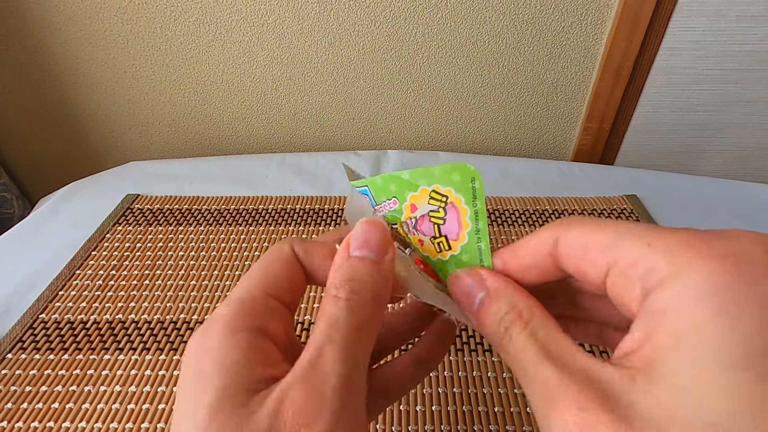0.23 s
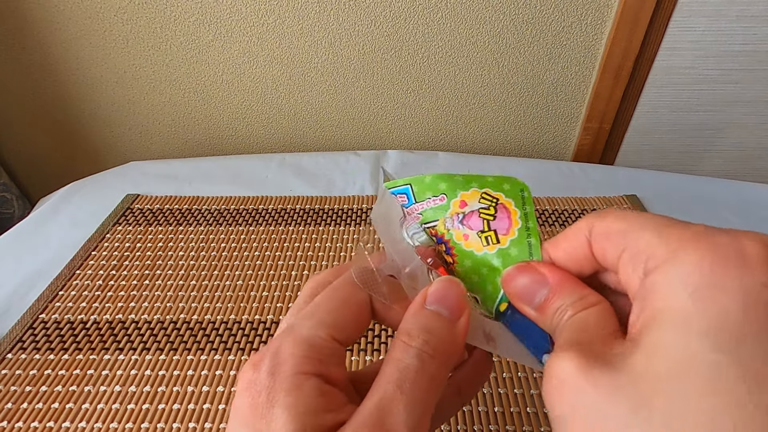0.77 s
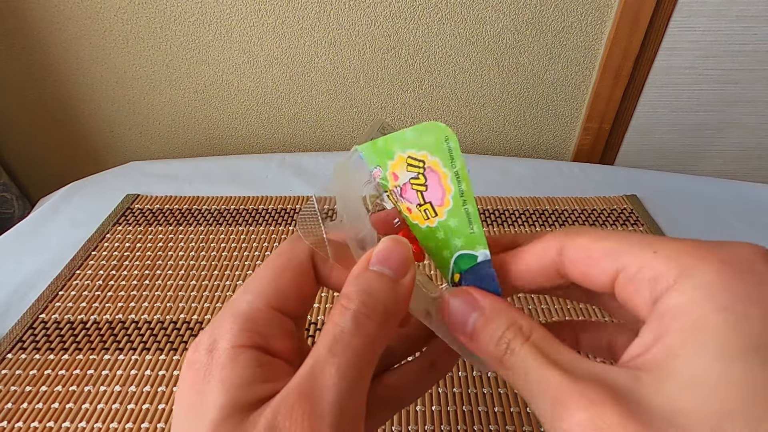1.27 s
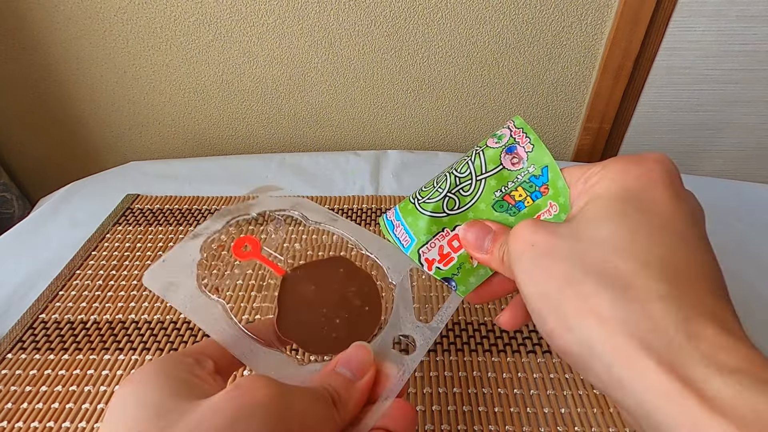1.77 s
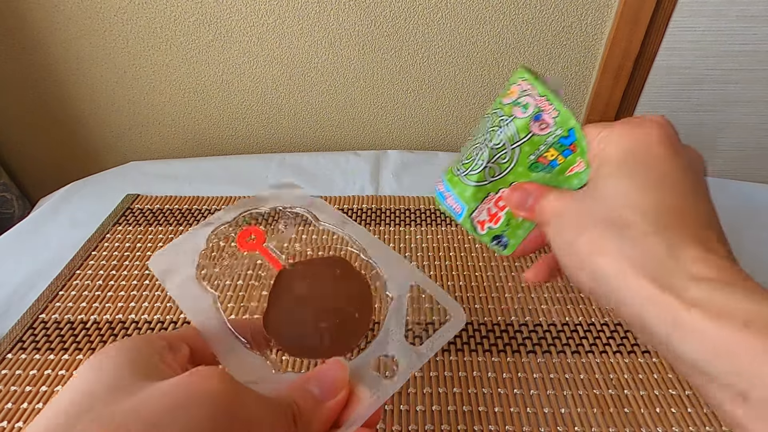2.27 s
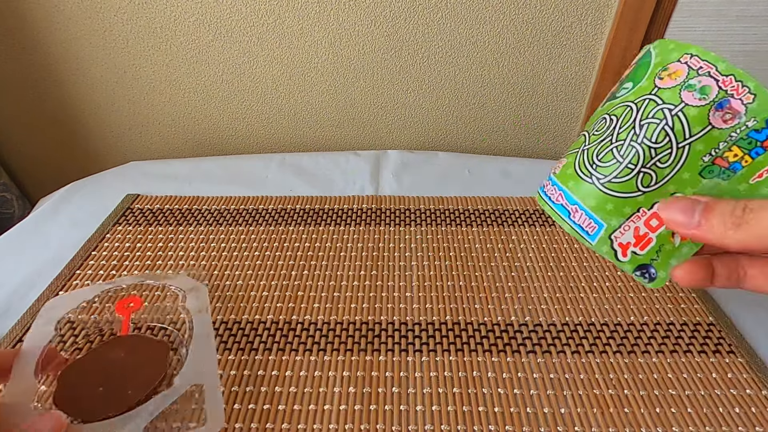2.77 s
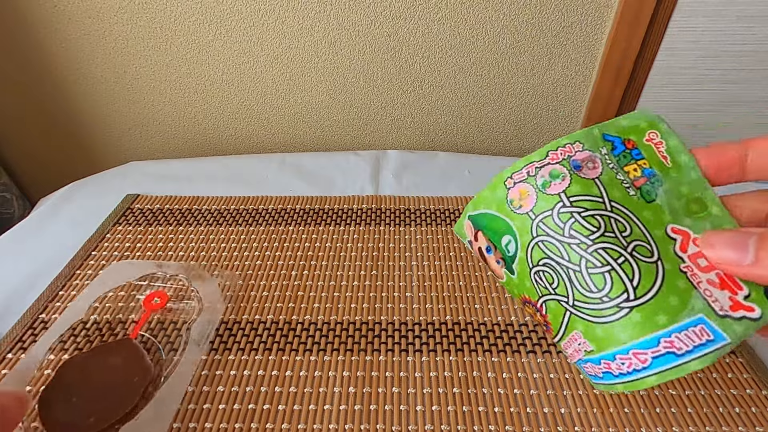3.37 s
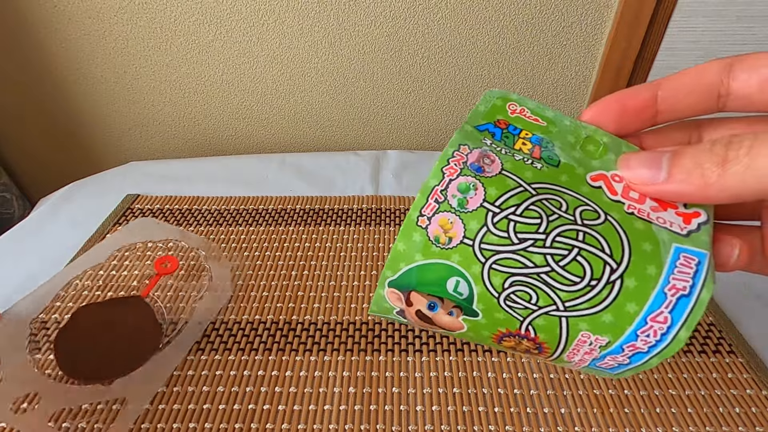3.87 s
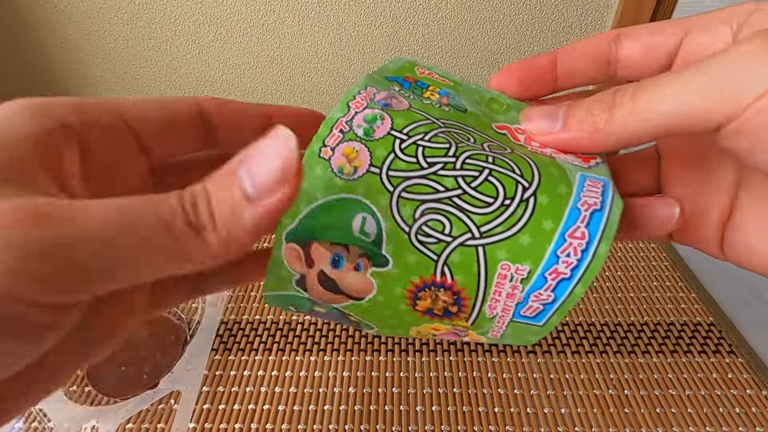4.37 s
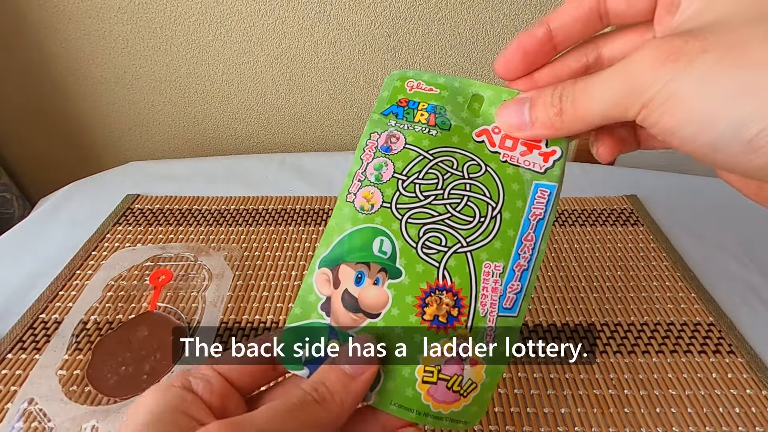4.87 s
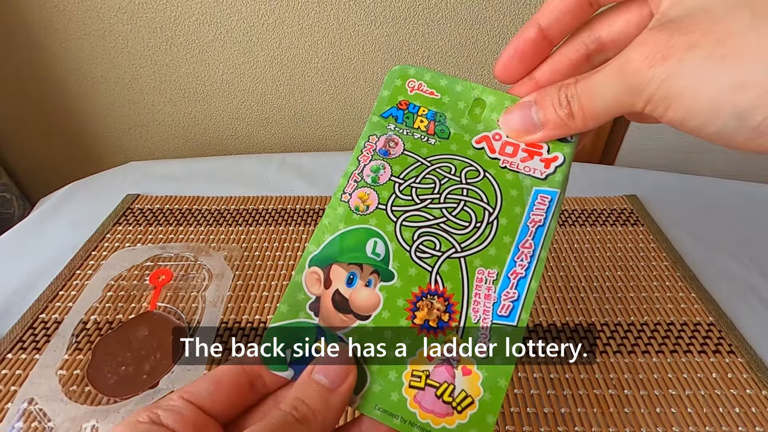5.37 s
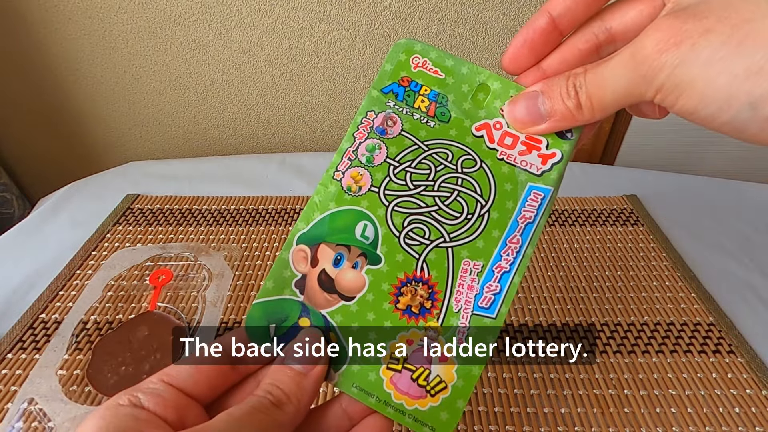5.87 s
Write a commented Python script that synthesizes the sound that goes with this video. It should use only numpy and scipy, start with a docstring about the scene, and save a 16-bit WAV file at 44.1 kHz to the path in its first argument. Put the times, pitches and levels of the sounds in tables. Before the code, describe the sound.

Very close in a small quiet room, hands pick at a sheet sealed to a thin plastic tray. A sharp crackle opens, then small ticks and faint rasps, growing into a loud tearing burst before two seconds and another hard cluster of snaps soon after. The tray thumps and rumbles over a ribbed mat, fingers rustle on the sheet with crisp pops, then it is held nearly still with a few clicks.

```python
"""Peeling a sheet from a plastic tray

A printed backing sheet is peeled off a thin plastic snack tray, close by in a small quiet room. Sheet and tray
buckle in snaps (kicked, band-limited noise bursts) and small creases ring, while the seal tears with a grainy
rasp (stick-slip pulses in noise). The tray is pushed over a ribbed mat and the table rumbles (resonant noise),
while fingers slide over the sheet and flex it a few times. Echoes and a faint room tone lie behind.
"""
import sys
import numpy as np
from scipy import signal
from scipy.fft import rfft, irfft
from scipy.io import wavfile
from scipy.ndimage import uniform_filter1d, map_coordinates

SR = 44100
rng = np.random.default_rng(int(sys.argv[2]) if len(sys.argv) > 2 else 0)


def int16_out(signal):
    """Quantize to a 16-bit WAV file."""
    q = np.round(np.clip(np.atleast_2d(signal).T, -1, 1) * 32767)
    wavfile.write(sys.argv[1], SR, q.astype(np.int16))


N = 269890
TIME = np.arange(N) / SR

# buckles of sheet and tray; levels are rms over one SNAP_S:
# (time [s], ring level [dB], ring pitch [Hz], crack level [dB], crack pitch [Hz])
BUCKLES = [(0.0027, -16.5, 1800, -17.5, 5100), (0.033, -32, 1190, -55, 4600),
           (0.05, -21.5, 1450, -40, 3360), (0.184, -45, 1260, -47, 3640), (0.48, -28.5, 1050, -18.5, 2500),
           (0.5966, -46, 1240, -41.5, 2600), (0.6265, -46, 1740, -45, 4800),
           (0.6719, -33, 1040, -41.5, 5450), (0.7072, -36.5, 980, -51, 5500),
           (0.7344, -33, 1470, -64, 4000), (0.8002, -23.5, 1800, -28.5, 4620), (0.95, -25, 1530, -61, 4100),
           (0.956, -28, 1820, -56, 2900), (0.9801, -31, 1150, -35.5, 2320), (1.042, -47, 890, -46, 2370),
           (1.1526, -38, 1280, -75, 5430), (1.165, -31, 1100, -29, 2800), (1.173, -12, 2010, -23.5, 6460),
           (1.2865, -51, 1300, -39, 5900), (1.3066, -36.5, 1140, -35, 3270),
           (1.3922, -24.5, 1220, -34, 2970), (1.433, -31.5, 1230, -34.5, 5000),
           (1.47, -26.5, 1090, -35.5, 4660), (1.5654, -38.5, 1410, -45.5, 4800),
           (1.599, -35.5, 1180, -47, 4340), (1.685, -26.5, 586, -28, 2640),
           (1.721, -18.5, 990, -25.5, 5100), (1.7364, -19.5, 860, -39, 4600),
           (1.764, -14.5, 1010, -18, 5700), (1.7663, -23.5, 900, -31, 4900),
           (1.7906, -16.5, 850, -23, 2380), (1.799, -19, 911, -29.5, 3420), (1.8416, -25, 1330, -47, 5600),
           (1.8889, -31.5, 1380, -38.5, 4580), (2.323, -15.5, 1540, -14.5, 6300),
           (2.3263, -14.5, 1670, -24.5, 5800), (2.3328, -24, 1750, -34, 4700),
           (2.3827, -17.5, 1300, -26, 3350), (2.3835, -12.5, 1210, -24, 2850),
           (2.3925, -14.5, 1230, -25, 3540), (2.4208, -24, 1300, -37, 5100), (2.436, -20, 1190, -27, 3300),
           (2.513, -28.5, 1640, -31, 4870), (2.6176, -34.5, 1290, -53, 6500),
           (2.809, -20.5, 2010, -22, 2780), (2.867, -28.5, 1750, -36, 3550), (2.9941, -28, 2300, -53, 5650),
           (3.7028, -31, 1530, -35, 5440), (3.7891, -30.5, 884, -37, 3900),
           (3.8471, -24, 1230, -25.5, 3400), (3.9165, -22, 1660, -29.5, 5940),
           (3.931, -29, 1760, -36, 4740), (3.955, -30, 1780, -37, 5650), (3.9757, -30, 1750, -38, 5400),
           (4.026, -34, 1880, -39.5, 3060), (4.1406, -40.5, 2170, -40, 4300),
           (4.3355, -37.5, 645, -35, 1610), (5.083, -33, 880, -61, 2390), (5.1366, -16, 1080, -29.5, 3320),
           (5.149, -19.5, 1150, -34, 3590), (5.2306, -29, 905, -55, 1880), (5.4367, -34, 734, -39, 1565),
           (5.502, -42, 1010, -79, 2927)]
SNAP_S = 0.002
# a larger panel rings lower and pushes more air: thud relative to the ring at PANEL_HZ, and its change with pitch
PANEL_HZ, THUD_DB, THUD_DB_PER_OCTAVE = 1100, -9, -10.5

# Stroke tables: levels are relative to the trims of the layer they drive.
# pulls that tear the seal or drag the sheet over the rim:
# (peak time [s], rise [s], fall [s], rasp level [dB], hiss level [dB])
PEEL_PULLS = [(0.005, 0.03, 0.096, -45, -38), (0.16, .04, 0.17, -61, -50), (0.26, .1, 0.089, -53, -47),
              (0.485, 0.04, 0.32, -55, -50.5), (0.81, 0.0077, 0.3, -51, -54.5),
              (0.957, 0.022, 0.1, -35.5, -49), (1.093, .01, .1, -62, -61), (1.177, 0.028, 0.13, -46, -42),
              (1.283, 0.025, 0.052, -47.5, -39.5), (1.368, 0.042, 0.0087, -52.5, -38.5),
              (1.40, 0.016, 0.21, -44, -57), (1.475, .025, 0.086, -35.5, -41), (1.57, .08, 0.11, -43, -47),
              (1.726, 0.016, 0.14, -27.5, -36), (1.795, .12, 0.13, -28, -40.5),
              (2.155, .13, 0.069, -53.5, -66.5), (2.23, .03, 0.1, -63.5, -62),
              (2.325, .018, 0.051, -26.5, -30), (2.388, 0.036, .10, -25, -36)]
# slides of the fingers while the sheet is turned over:
# (peak time [s], rise [s], fall [s], rasp level [dB], hiss level [dB])
FINGER_SLIDES = [(2.705, 0.072, 0.26, -44.5, -46), (2.87, 0.17, 0.052, -44.5, -48),
                 (2.995, 0.081, 0.069, -47, -39.5), (3.167, 0.088, 0.2, -42.5, -42.5),
                 (3.462, 0.081, 0.058, -50.5, -46.5), (3.54, 0.033, 0.035, -45, -47.5),
                 (3.60, 0.046, 0.15, -41.5, -48.5), (3.70, 0.12, 0.14, -39.5, -43),
                 (3.79, 0.019, 0.052, -44, -44), (3.853, 0.0096, 0.031, -26.5, -43.5),
                 (3.925, 0.036, 0.095, -30.5, -37.5), (4.088, 0.085, 0.13, -49.5, -45.5),
                 (4.32, 0.13, 0.17, -71, -61)]
# shifts of the grip on the held sheet: (peak time [s], rise [s], fall [s], rasp level [dB], hiss level [dB])
GRIP_SHIFTS = [(0.36, 0.071, 0.53, -63.5, -59.5), (0.62, 0.033, 0.24, -65, -66.5),
               (4.555, 0.0076, 0.049, -55.5, -59), (4.665, 0.036, 0.31, -55.5, -53.5),
               (4.775, 0.039, 0.06, -49.5, -64.5), (4.815, 0.014, .12, -58, -54.5),
               (4.903, 0.017, 0.026, -43.5, -65), (4.96, 0.23, 0.3, -65, -61),
               (5.088, 0.013, .06, -50.5, -63), (5.143, 0.041, 0.061, -37.5, -55),
               (5.237, .01, 0.041, -59.5, -81), (5.44, .01, 0.067, -50, -86), (5.5, .07, .12, -65.5, -73)]
# the sheet edge singing thinly as it slides: (peak time [s], rise [s], fall [s], level [dB])
EDGE_ZINGS = [(2.32, 0.027, 0.071, -55), (2.37, .04, 0.011, -42), (3.32, 0.29, 0.13, -55),
              (3.46, 0.063, 0.059, -47)]
# shoves and bumps that shake the table:
# (peak time [s], rise [s], fall [s], rumble level [dB], slow sway level [dB])
TABLE_SHOVES = [(0.98, 0.056, 0.11, -56, -49), (1.18, 0.063, 0.53, -55, -57),
                (1.40, 0.019, 0.089, -57, -68), (1.58, .06, 0.18, -54, -42.5),
                (1.73, 0.05, 0.11, -35.5, -57), (1.80, 0.053, .13, -35, -44.5),
                (2.335, 0.018, .19, -30, -42), (2.805, 0.024, 0.29, -24.5, -65),
                (2.86, 0.076, 0.053, -37.5, -40), (3.17, 0.22, 0.29, -47, -60), (3.42, 0.093, .4, -46, -70),
                (3.56, .06, 0.24, -38, -57), (3.68, 0.072, 0.28, -31, -40),
                (3.805, 0.044, 0.27, -30.5, -39), (3.925, 0.035, 0.16, -28.5, -39),
                (4.135, 0.086, 0.094, -30.5, -34), (4.19, .05, 0.24, -59.5, -34),
                (4.80, .05, 0.043, -57, -65), (4.905, 0.014, 0.031, -51, -64),
                (5.15, 0.041, 0.07, -34.5, -34.5), (5.237, .012, 0.044, -48.5, -57),
                (5.44, .012, .05, -57, -69)]
FADE_DB = 20  # a stroke climbs this far in its rise time and sinks as far in its fall time
LET_GO_DB = 39.5  # beyond those times the contact is lost: extra loss per further rise or fall time

# relative spectrum of the tearing seal: (frequency [Hz], level [dB])
PEEL_SPECTRUM = [(150, 8), (250, 9), (420, 0.5), (700, 5), (1100, 7), (1700, -3), (2500, -11.5),
                 (3600, -16.5), (4800, -18.5), (6300, -19), (7600, -21), (8900, -36.5), (12000, -49.5),
                 (15000, -63.5)]
# relative spectrum of the sliding fingers: (frequency [Hz], level [dB])
SLIDE_SPECTRUM = [(200, -10), (420, -4), (750, 2), (1200, 3.5), (1850, 10.5), (2500, -1.5), (3400, -3),
                  (4600, -6.5), (6100, -6.5), (7600, -11.5), (8900, -28.5), (12000, -40), (15000, -48)]
# relative spectrum of the shifting grip: (frequency [Hz], level [dB])
GRIP_SPECTRUM = [(150, 16), (400, 14.5), (800, 9), (1600, 3), (2600, -13), (4200, -17.5), (6000, -15),
                 (7500, -13), (8900, -31), (12500, -35), (15000, -53.5)]
SPLIT_HZ = 2700  # rasp lies below, hiss above

# low resonances of the table: (frequency [Hz], bandwidth [Hz], relative level [dB])
TABLE_RESONANCES = [(74, 8.3, -4.5), (96.2, 17, 3), (144.7, 13, 3), (204.9, 24, -1), (254, 46, -11.5)]
# narrow resonances of the table top and the corner around it: (frequency [Hz], level [dB])
CORNER_RESONANCES = [(210, 8), (501, -0.5), (615, 0), (706, 5.5), (864, -2), (937, -6), (1205, -3.5),
                     (1365, -7)]
# reverberation time of the room, for a decay of 60 dB: (frequency [Hz], time [s])
REVERB_TIMES = [(150, 0.23), (500, 0.09), (1500, 0.24), (4000, 0.33), (8000, .24)]
# relative spectrum of the quiet room: (frequency [Hz], level [dB])
ROOM_SPECTRUM = [(12, -37.5), (20, -11), (55, -4), (98, -25.5), (155, -13.5), (176, -15), (278, -20),
                 (323, -20), (449, -21.5), (497, -18.5), (536, -34.5), (726, -27), (2210, -26.5),
                 (3230, -42), (8450, -55.5), (11000, -80.5), (18600, -120)]
ROOM_DB = -62.5
CUTOFF_HZ = 15300


def snaps(scatter=0.16, crack_scatter=0.39, tear_slope=0.16, ring_cycles=5.3, crack_cycles=8.2,
          thud_s=0.005, tick_s=0.00083, ring_width=1.5, crack_width=1.28, tick_db=-24.0):
    """Impulsive buckling: one sharp kick, then decaying bending waves that run back and forth in the sheet."""
    t = TIME[:SR // 25]
    out = np.zeros(N + len(t))
    ring_band = ring_width ** np.array([-1, 1])  # band edges as ratios to the pitch
    crack_band = crack_width ** np.array([-1, 1])
    chances = rng.standard_normal((len(BUCKLES), 4, len(t)))
    for (s, ring_db, ring_hz, crack_db, crack_hz), chance in zip(BUCKLES, chances):
        decay_s = np.array([[ring_cycles / ring_hz], [crack_cycles / crack_hz], [thud_s], [tick_s]])
        # a strong crack runs on as a short zip
        tearing = crack_scatter * from_db(tear_slope * (crack_db + 31.5))
        shares = np.array([[scatter], [tearing], [scatter], [tearing]])
        kick = t == 0
        flex, crease, push, edge = kick + shares * chance * np.exp(-t / decay_s)

        ring = butter(flex, ring_hz * ring_band, "band")  # the panel that flips
        crack = butter(crease, crack_hz * crack_band, "band")  # the crease itself
        ring, crack = butter([ring, crack], 7930, "low", order=12)
        thud = butter(push, [185, 560], "band")  # the whole sheet recoils
        tick = butter(edge, [8000, 12500], "band")

        thud_db = ring_db + THUD_DB + THUD_DB_PER_OCTAVE * np.log2(ring_hz / PANEL_HZ)
        # high creases reach further into the top treble
        edge_db = crack_db + tick_db + 13 * np.log2(crack_hz / 6000)
        start = max(0, int(s * SR))
        for part, db in ((ring, ring_db), (crack, crack_db), (thud, thud_db), (tick, edge_db)):
            unit_part = part * np.sqrt(SNAP_S * SR / np.sum(part ** 2))
            out[start:start + len(t)] += from_db(db) * unit_part
    return out[:N]


def crinkles(rows, per_s, level_db, spread_db=1.0, cycles=1.4, low_hz=1200, high_hz=6000):
    """Randomly excited resonance: small creases flip by chance, each ringing briefly at one of eight pitches."""
    pitches = np.geomspace(low_hz, high_hz, 8)
    born = rng.random(N) < per_s / SR
    dealt = rng.integers(0, len(pitches), N)
    size_db = level_db + spread_db * np.minimum(rng.exponential(1, N), 3)
    sizes = born * from_db(size_db) * rng.choice([-1, 1], N)
    rasp_gain, hiss_gain = strokes(rows)
    out = 0
    for k, hz in enumerate(pitches):
        radius = from_db(-60 * hz / (cycles * SR))  # the ring falls 60 dB in this many cycles
        angle = 2 * np.pi * hz / SR
        kicks = sizes * (dealt == k) * (rasp_gain if hz < SPLIT_HZ else hiss_gain)
        resonator = [1, -2 * radius * np.cos(angle), radius ** 2]
        out = out + signal.lfilter([0, np.sin(angle)], resonator, kicks + 1e-18)
    return butter(out, 8600, "low", order=8)


def friction(rows, spectrum, slips_per_s, spread_db, smooth, flutter_db, rasp_db, hiss_db):
    """Stick-slip friction: tiny releases of uneven size, in clumps, over a smooth rubbing noise."""
    sizes = from_db(spread_db * np.minimum(rng.exponential(1, N), 4)) * rng.choice([-1, 1], N)
    clumped_rate = slips_per_s * from_db(3 * drift(90))
    slips = sizes * (rng.random(N) < clumped_rate / SR)
    rubbing = smooth * rng.standard_normal(N)
    grain = bending(coloured(rms_one(slips) + rubbing, spectrum))
    rasp = butter(butter(grain, 230, "high"), SPLIT_HZ, "low", order=4)
    rasp = evened(rasp, 0.05)
    hiss = evened(butter(grain, SPLIT_HZ, "high", order=4), 0.15)
    rasp_gain, hiss_gain = strokes(rows)
    rub = from_db(rasp_db) * rasp_gain * rasp + from_db(hiss_db) * hiss_gain * hiss
    return rub * from_db(flutter_db * drift(160))


def bending(x, depth_db=2.5, spacing_hz=240, shifts_per_s=18):
    """Time-varying resonance: the many peaks of the sheet's response come and go as it bends."""
    hz, s, frames = signal.stft(x, SR, nperseg=512)
    field = rng.standard_normal((128, 256))
    places = np.meshgrid(hz / spacing_hz, s * shifts_per_s, indexing="ij")
    peaks = map_coordinates(field, places, order=1, mode="mirror")
    return signal.istft(frames * from_db(depth_db * rms_one(peaks)), SR)[1][:N]


def zing(hz=6100, width_hz=1000):
    """Friction-driven resonance: the sliding edge excites one high, broad mode."""
    tone = butter(rng.standard_normal(N), [hz - width_hz / 2, hz + width_hz / 2], "band")
    return strokes(EDGE_ZINGS)[0] * rms_one(tone) * from_db(4.3 * drift(91))


def table(sway_db=-2.0):
    """Forced vibration: hands and tray rub over the ribs of the mat and shake the low modes of the table."""
    bumps = rng.standard_normal(N)
    rumble = 0
    for hz, width, db in TABLE_RESONANCES:
        mode = butter(bumps, [hz - width / 2, hz + width / 2], "band")
        rumble = rumble + from_db(db) * evened(mode, 0.2)
    sway = evened(butter(rng.standard_normal(N), [24, 58], "band"), 0.089)
    rumble_gain, sway_gain = strokes(TABLE_SHOVES)
    return rumble_gain * rms_one(rumble) + from_db(sway_db) * sway_gain * sway


def corner(x, width_hz=16):
    """Sympathetic resonance: the plastic sounds set nearby narrow modes ringing faintly."""
    ringing = 0
    for hz, db in CORNER_RESONANCES:
        band = [hz - width_hz / 2, hz + width_hz / 2]
        ringing = ringing + from_db(db) * butter(x, band, "band", order=1)
    return ringing


def room(x, gap_s=0.0035, low_db=5.0, high_db=-9.5):
    """Reverberation: dense wall echoes arrive after a short gap and die away band by band."""
    t = TIME[:SR // 2]
    response = 0
    edges = np.geomspace(90, 16000, 9)
    for low, high in zip(edges, edges[1:]):
        hz = np.sqrt(low * high)
        decay = from_db(-60 * t / at_hz(REVERB_TIMES, hz))
        onset = np.clip(t / gap_s - 0.5, 0, 1)  # silent for half of gap_s, full after 1.5 of it
        tail = rng.standard_normal(len(t)) * decay * onset
        colour_db = at_hz([(600, low_db), (2000, 0.0039), (7000, high_db)], hz)
        echo_band = butter(tail / np.sqrt(np.sum(tail ** 2)), [low, high], "band")
        response = response + from_db(colour_db) * echo_band
    return signal.fftconvolve(x, response)[:N]


def room_tone():
    """Stationary background noise: the faint, steady sound of the quiet room."""
    return from_db(ROOM_DB) * coloured(rng.standard_normal(N), ROOM_SPECTRUM)


def strokes(rows):
    """Power addition of envelopes: strokes swell and die away, overlaps add in power; one gain per level column."""
    t = TIME[::16]
    power = 0
    for s, rise_s, fall_s, *levels_db in rows:
        away = np.maximum((s - t) / rise_s, (t - s) / fall_s)
        below_db = FADE_DB * away + LET_GO_DB * np.maximum(away - 1, 0)
        power = power + from_db(np.array(levels_db)[:, None] - below_db) ** 2
    return [np.interp(TIME, t, np.sqrt(p + 1e-18)) for p in power]


def drift(per_s):
    """Slow random modulation: chance values joined by straight lines, with spread 1."""
    return np.interp(TIME * per_s, np.arange(8000), rng.standard_normal(8000)) * np.sqrt(3 / 2)


def evened(x, seconds):
    """Level normalisation: hold the running rms of a signal at 1."""
    power = np.abs(uniform_filter1d(x ** 2, max(3, int(seconds * SR))))
    return x / np.sqrt(power + 1e-12)


def coloured(x, spectrum):
    """Spectral shaping: weight a signal's frequencies by a table, at unit rms."""
    gain = from_db(at_hz(spectrum, np.fft.rfftfreq(N, 1 / SR)))
    return rms_one(irfft(rfft(x) * gain, N))


def butter(x, hz, kind, order=2):
    """Linear filtering: a causal Butterworth filter."""
    sos = signal.butter(order, np.clip(hz, 10, 0.45 * SR), kind, fs=SR, output="sos")
    return signal.sosfilt(sos, x)


def at_hz(points, hz):
    """Logarithmic frequency scale: read a table along it."""
    f, value = np.transpose(points)
    return np.interp(np.log(np.maximum(hz, 1)), np.log(f), value)


def rms_one(x):
    """Effective value: scale to unit rms."""
    return x / np.sqrt(np.mean(x ** 2) + 1e-20)


def from_db(db):
    """Logarithmic level: decibels to amplitude gain."""
    return 10 ** (np.asarray(db) / 20)


def scene():
    """Superposition: all sounds add in the centre, and mainly the treble spreads a little to the sides."""
    peel = friction(PEEL_PULLS, PEEL_SPECTRUM, slips_per_s=330, spread_db=5.5, smooth=0.93,
                    flutter_db=1.97, rasp_db=-3.0, hiss_db=-1.0)
    slide = friction(FINGER_SLIDES, SLIDE_SPECTRUM, slips_per_s=830, spread_db=1.0, smooth=0.6,
                     flutter_db=2.5, rasp_db=-3.5, hiss_db=-0.5)
    hold = friction(GRIP_SHIFTS, GRIP_SPECTRUM, slips_per_s=4800, spread_db=2.0, smooth=0.7,
                    flutter_db=1.5, rasp_db=-2.0, hiss_db=-0.5)
    creases = crinkles(PEEL_PULLS, per_s=150, level_db=2) + crinkles(FINGER_SLIDES, per_s=220, level_db=9)
    plastic = snaps() + creases + peel + slide + hold + zing()
    echoes = room(plastic)
    quiet = room_tone()
    mid = plastic + from_db(-15.5) * echoes + from_db(-6.5) * corner(plastic) + table() + quiet
    # the treble spreads slightly to the sides, and the highest echoes differ between left and right
    treble_spread = from_db(-36.5) * np.gradient(plastic)
    side = treble_spread + from_db(-9.5) * butter(echoes, 8200, "high", order=8)
    return np.array([mid + side, mid - side])


def record(dry):
    """Band limitation: the microphone loses the highest treble, and the top is cut steeply."""
    dulled = butter(dry, 13000, "low", order=4)
    steep_cut = signal.ellip(10, 0.1, 80, CUTOFF_HZ, fs=SR, output="sos")
    return signal.sosfilt(steep_cut, dulled)


dry = scene()
out = record(dry)
int16_out(out)
```